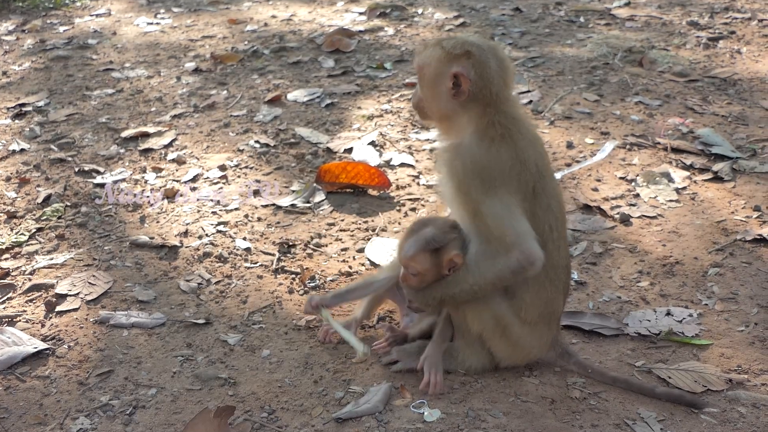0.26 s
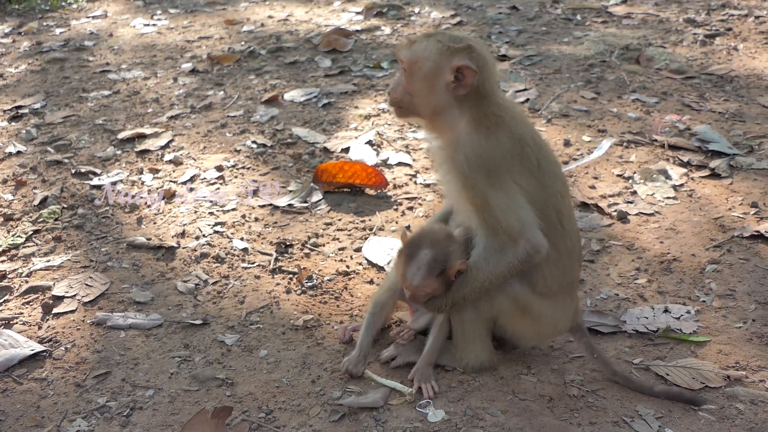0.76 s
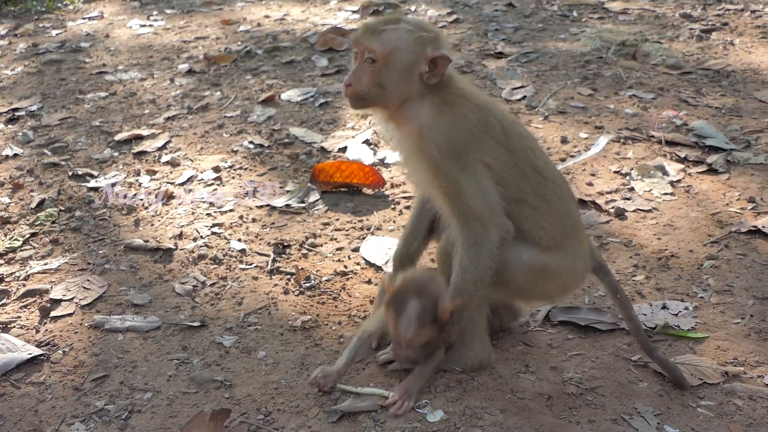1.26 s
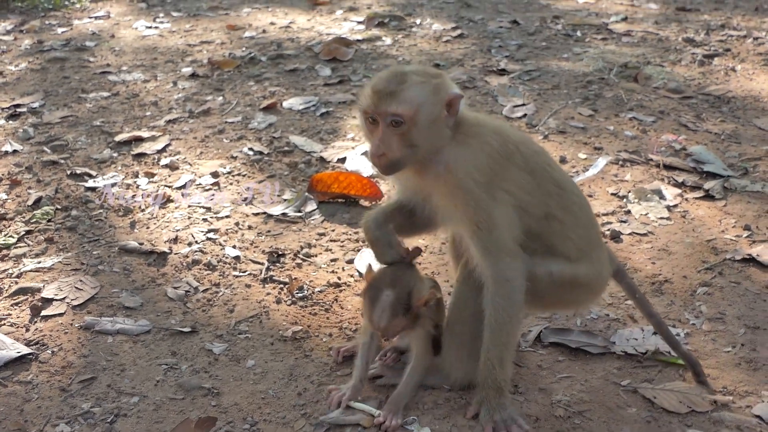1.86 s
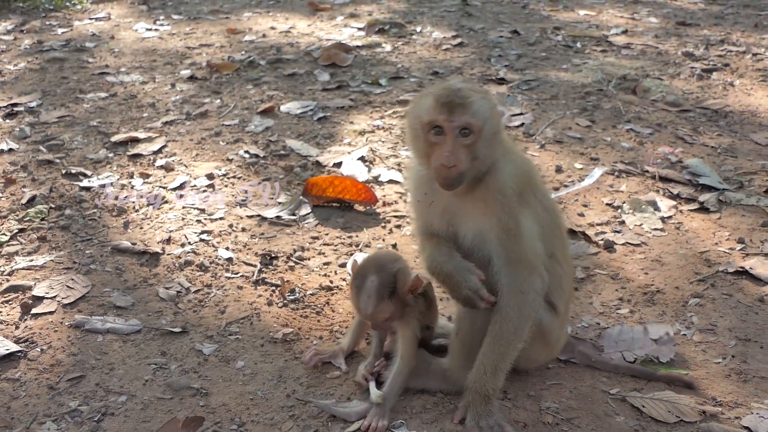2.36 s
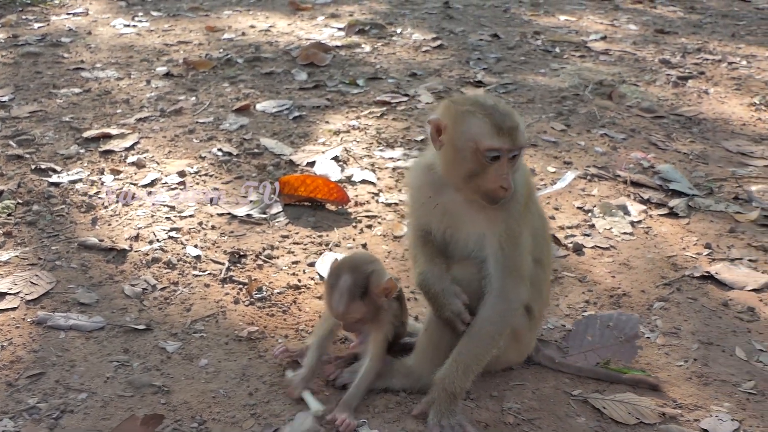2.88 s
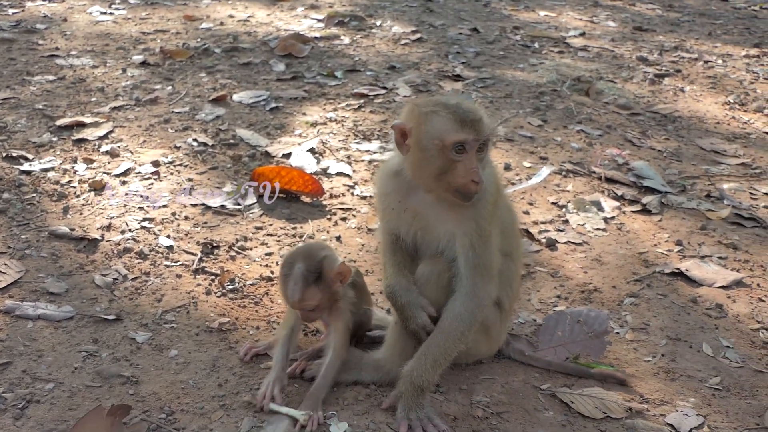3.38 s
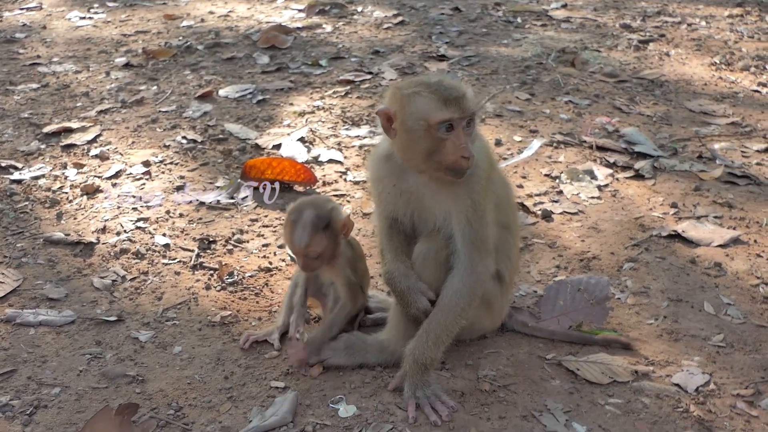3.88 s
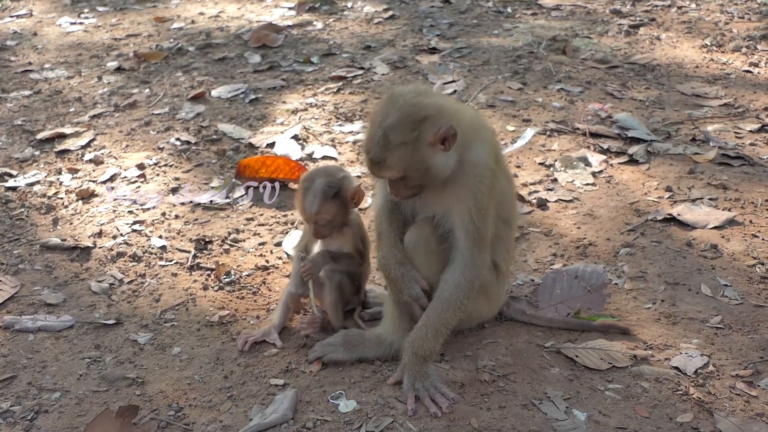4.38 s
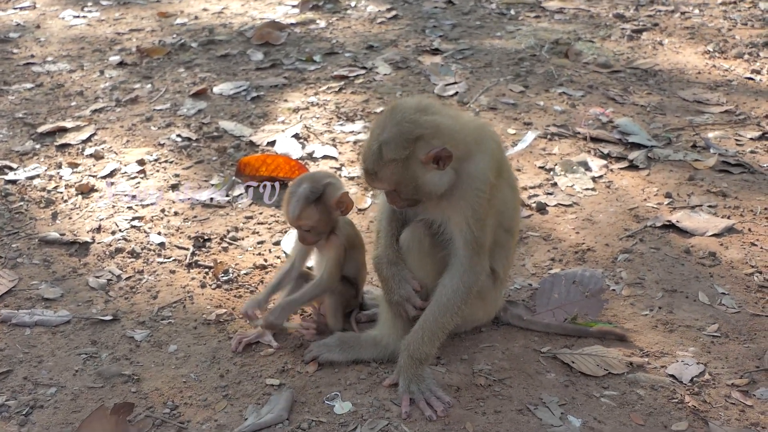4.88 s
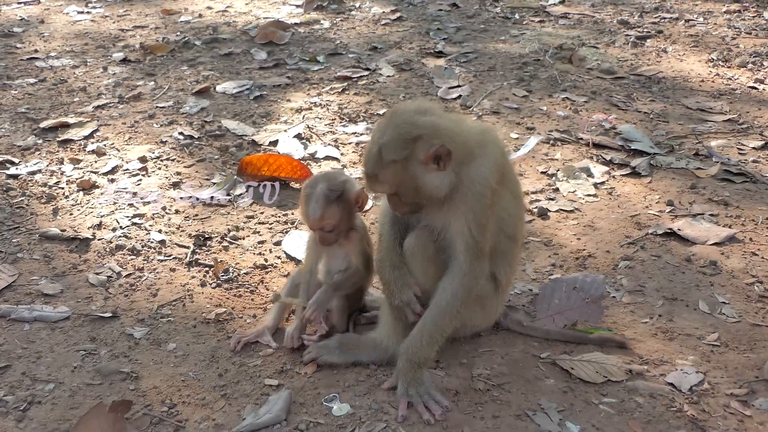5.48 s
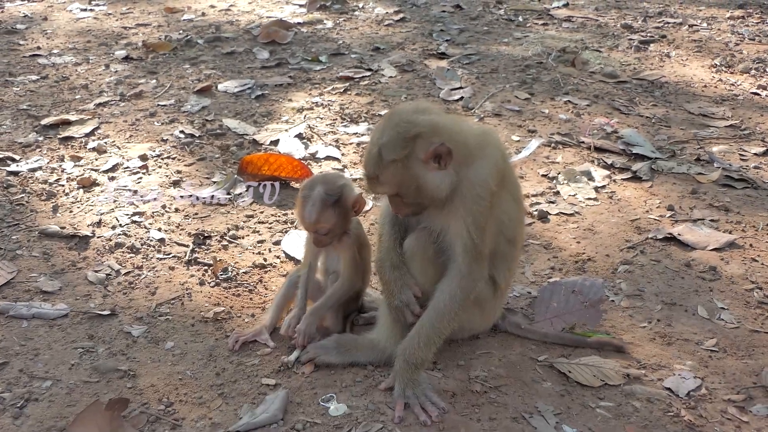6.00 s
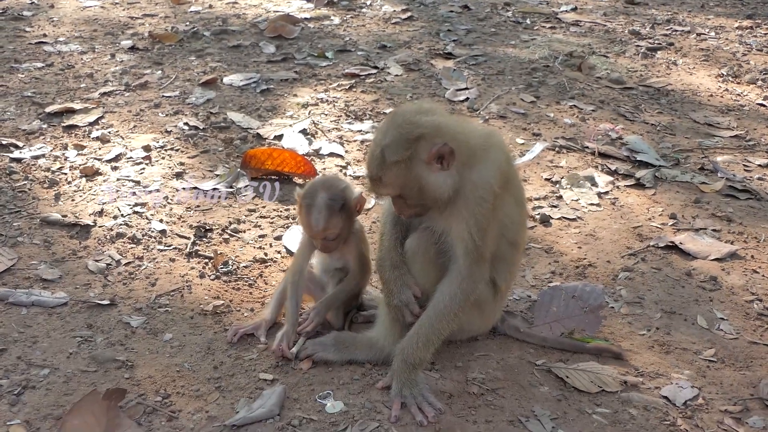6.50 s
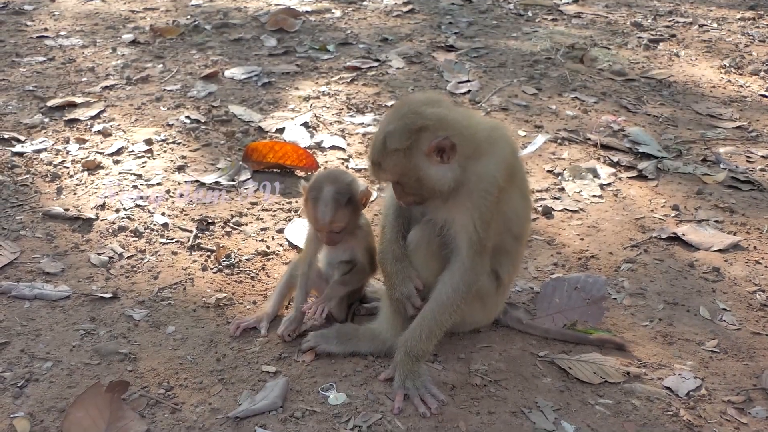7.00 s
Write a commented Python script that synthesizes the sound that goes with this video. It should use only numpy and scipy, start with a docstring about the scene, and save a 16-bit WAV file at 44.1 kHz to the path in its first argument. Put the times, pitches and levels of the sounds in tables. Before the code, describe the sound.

A piercing, steady cicada drone fills a forest while another insect rasps in slow bursts and dry leaves faintly crackle under shifting monkeys.

```python
"""Forest: cicadas drone, one near singer standing out of a wide chorus; another insect rasps in slow bursts.
Cicada tones are multiples of a trembling click rate; the chorus and the rasp are shaped noise.
Two monkeys shift on dry leaves (sparse crackle, snaps) and handle a small stalk (scuffs, woody rings).
A far bird whistles faint glides over a low, distant rumble of noise and a wavering hum."""
import sys
import numpy as np
from scipy.fft import rfft, irfft, next_fast_len
from scipy.io import wavfile
from scipy.ndimage import map_coordinates

SR = 44100
rng = np.random.default_rng(int(sys.argv[2]) if len(sys.argv) > 2 else 0)


def store_pcm(level_fs):
    """Save levels as 16-bit WAV."""
    pcm = np.round(np.clip(level_fs, -1, 1) * 32767).astype(np.int16)
    wavfile.write(sys.argv[1], SR, np.atleast_2d(pcm).T)


N = 319725
TIME_S = np.arange(N) / SR


def amp(db):
    """Gain of a level in dB."""
    return 10 ** (np.asarray(db) / 20)


def unit(x):
    """x at rms 1."""
    return x / np.sqrt(np.mean(x ** 2) + 1e-20)


def noise(*shape):
    """White Gaussian noise."""
    return rng.standard_normal(shape)


def along(points, hz):
    """(Hz, value) points interpolated on a log frequency axis."""
    point_hz, value = np.transpose(points)
    return np.interp(np.log(hz + 1), np.log(point_hz + 1), value)


def curves(rows):
    """One value per sample for each column after the time."""
    knot_s, *columns = np.transpose(rows)
    return [np.interp(TIME_S, knot_s, column) for column in columns]


def wobble(knots_per_s):
    """A smooth random curve: a spline through random knots."""
    coarse = np.arange(0, N + 32, 32)
    knots = noise(int(N * knots_per_s / SR) + 4)
    values = map_coordinates(knots, [coarse * knots_per_s / SR])
    return np.interp(np.arange(N), coarse, values)


def rhythm(swings_per_s, drift_cycles):
    """A swing between -1 and 1 that runs early or late by about drift_cycles."""
    return np.sin(2 * np.pi * (swings_per_s * TIME_S + drift_cycles * wobble(1)))


def filtered(x, response):
    """x times a response of frequency."""
    size = next_fast_len(N + SR // 4, real=True)
    hz = np.fft.rfftfreq(size, 1 / SR)
    return irfft(rfft(x, size) * response(hz), size)[..., :N]


def shaped(x, spectrum):
    """x through a (Hz, dB) gain curve."""
    return filtered(x, lambda hz: amp(along(spectrum, hz)))


def coloured(x, spectrum):
    """x with a (Hz, dB) spectrum, at rms 1."""
    return unit(shaped(x, spectrum))


def scattered(phase, direct, fades_per_s):
    """A tone arrives directly and by many beating paths through the trees: two unrelated mixtures."""
    sine, cosine = np.sin(phase), np.cos(phase)
    pair = np.array([wobble(fades_per_s) * sine + wobble(fades_per_s) * cosine for _ in range(2)])
    pair[0] += direct * sine
    return pair / np.sqrt(1 + direct ** 2 / 2)


def trunks(x, echo_db=-16, count=8):
    """Nearby trunks return weak copies, 5 to 50 ms late, that comb the sound."""
    delays = rng.integers(SR // 200, SR // 20, count)
    echoes = sum(np.pad(x, ((0, 0), (delay, 0)))[:, :N] for delay in delays)
    return x + amp(echo_db) * echoes


# left-right likeness: freq_hz, likeness_0_to_1
LIKENESS = [(25, .5), (70, 0.92), (300, 0.12), (1500, 0.32), (2700, 0.77), (4200, 0.75), (5400, 0.94),
            (8200, 0.9), (10000, 0.7), (12000, 0.7), (15000, 0.1)]


def stereo(pair):
    """Two unrelated signals become mid and side; the side shrinks where left and right are alike."""
    def mid_side_gain(hz):
        likeness = np.clip(along(LIKENESS, hz), 0, 1)
        return np.array([np.ones_like(hz), np.sqrt((1 - likeness) / (1 + likeness))])

    mid, side = filtered(pair, mid_side_gain)
    return np.array([mid + side, mid - side])


# rumble noise spectrum: freq_hz, relative_db
RUMBLE_SPECTRUM = [(22, -16), (31, -19), (40, -21), (54, -3), (76, -1), (120, -1.5), (160, -8),
                   (195, -16.5), (310, -16), (430, -23.5), (720, -20.5), (1100, -22), (2000, -22),
                   (4400, -36)]


def rumble(hum_hz=72, hum_db=-56, air_db=-50):
    """Distant low noise with a wavering hum in it, stronger on the right."""
    air = amp(air_db) * coloured(noise(2, N), RUMBLE_SPECTRUM)
    hum_phase = 2 * np.pi * np.cumsum(hum_hz + 2 * wobble(4)) / SR
    air[0] += amp(hum_db + 1.1 * wobble(3.8)) * np.sin(hum_phase)
    left_minus_right_db = [(40, -4.0), (100, -7.5), (170, -4.5), (300, -2.0), (1500, -0.5)]

    def lean(hz):
        half_db = along(left_minus_right_db, hz) / 2
        return amp(np.array([half_db, -half_db]))

    return filtered(stereo(air), lean)


# bird notes: start_s, length_s, start_hz, end_hz, relative_db
BIRD_NOTES = [(.53, 0.18, 1640, 1660, -69), (0.73, .16, 1720, 1690, -68), (1.789, 0.118, 1713, 1536, -67),
              (3.352, 0.1, 1390, 1397, -63)]


def bird(trim_db=6.0):
    """Soft gliding whistles, blurred by the trees."""
    level, pitch_hz = np.zeros(N), np.zeros(N)
    for start_s, length_s, start_hz, end_hz, db in BIRD_NOTES:
        n = round(length_s * SR)
        start = round(start_s * SR)
        level[start:][:n] = amp(db + trim_db) * np.hanning(n)
        pitch_hz[start:][:n] = np.linspace(start_hz, end_hz, n)
    return level * scattered(2 * np.pi * np.cumsum(pitch_hz) / SR, direct=0.9, fades_per_s=68)


# tones of each chorus singer: click_rate_multiple, relative_db
CHORUS_TONES = [(5, 0), (10, 1), (15, -8), (20, -26), (25, -40)]


def singers(crowd):
    """Many far cicadas on different click rates fill a noise band around each of their tones."""
    def bands(hz):
        power = sum(amp(db + along(crowd, hz / k)) ** 2 / k for k, db in CHORUS_TONES)
        return np.sqrt(power)

    return unit(filtered(noise(2, N), bands))


# chorus levels: time_s, slow_singers_db, fast_singers_db
CHORUS_LEVELS = [(0, -32.5, -34.5), (1.5, -32, -36), (3, -32.5, -34.5), (4.5, -32, -34.5), (5.7, -32, -32),
                 (7.25, -32.5, -32)]
# spread of the singers: click_rate_hz, relative_db
SLOW_CROWD = [(420, -50), (455, -24), (476, -17), (488, -9.5), (505, -7), (526, 0), (538, -1), (552, -12),
              (580, -60)]
FAST_CROWD = [(520, -68), (545, 8.5), (560, -4), (580, -14), (610, -13.5), (660, -80)]
# hiss spectrum: freq_hz, relative_db
HISS_SPECTRUM = [(1900, -49), (2400, -9), (3050, 5), (4000, -8), (4700, -37), (5900, 8.5), (6900, 0),
                 (7600, -14), (8500, 1), (9000, -13), (10600, 4.5), (11400, -6), (11800, -41), (15500, -36)]


def chorus(throbs_per_s=6.7, throb_db=2, stutter_db=4.0, hiss_db=-45.5):
    """The faster singers slowly join in, throbbing and stuttering; the farthest insects merge into a hiss."""
    slow_db, fast_db = curves(CHORUS_LEVELS)
    throb = throb_db * rhythm(throbs_per_s, drift_cycles=0.35)
    stutter = stutter_db * np.tanh(wobble(40))
    slow = amp(slow_db) * singers(SLOW_CROWD)
    fast = amp(fast_db + throb + stutter) * singers(FAST_CROWD)
    hiss = amp(hiss_db) * coloured(noise(2, N), HISS_SPECTRUM)
    return slow + fast + hiss


# rasp bursts: start_s, length_s, low_resonance_relative_db, high_resonance_relative_db
RASP_BURSTS = [(0.47, 0.26, -50, -57), (1.13, 0.19, -48, -40), (1.778, .22, -48, -44.5),
               (2.12, 0.14, -52, -48.5), (2.647, 0.26, -48.5, -42), (3.3, 0.26, -50.5, -42),
               (3.924, 0.18, -51, -43), (4.59, 0.092, -48.5, -54), (5.117, 0.14, -47, -49),
               (5.895, 0.18, -48.5, -60)]
# resonance spectra: freq_hz, relative_db
RASP_LOW_SPECTRUM = [(2000, -19), (2800, -3), (3200, 12.5), (3600, 8.5), (4200, 5.5), (5500, -35),
                     (6300, -23), (7200, -6), (9000, -10), (10500, -9), (12000, -43)]
RASP_HIGH_SPECTRUM = [(2800, -32), (3500, 2), (3900, 7), (4250, 7), (4650, -4.5), (6000, -9), (8000, -8),
                      (12000, -35)]


def rasping_insect(flutter_db=1.6, swell_db=0.5, rise_s=0.049, t60_s=1.56, low_trim_db=5.5, high_trim_db=-0.5):
    """Each burst of scraping swells unevenly, rings two broad resonances and dies away among the trees."""
    power = np.zeros((2, N))
    for start_s, length_s, low_db, high_db in RASP_BURSTS:
        attack = 1 - np.exp(-np.maximum(TIME_S - start_s, 0) / rise_s)
        decay = amp(-60 * np.maximum(TIME_S - start_s - length_s, 0) / t60_s)
        power += (amp([[low_db], [high_db]]) * attack * decay) ** 2
    unevenness = amp(swell_db * np.array([wobble(21.96), wobble(21.93)]))
    low_level, high_level = np.sqrt(power) * unevenness
    scrape = noise(2, 2, N) * amp(flutter_db * wobble(120))
    low = low_level * coloured(trunks(scrape[0]), RASP_LOW_SPECTRUM)
    high = high_level * coloured(trunks(scrape[1]), RASP_HIGH_SPECTRUM)
    return amp(low_trim_db) * low + amp(high_trim_db) * high


def breaks(per_s):
    """Sparse random impulses: tiny leaf breaks."""
    return noise(2, N) * (rng.random((2, N)) < per_s / SR)


# litter shuffle: time_s, relative_db
SHUFFLE_LEVELS = [(0, -78), (1, -70), (1.4, -57), (1.7, -75), (2, -60), (2.5, -61), (3.52, -59),
                  (3.61, -48), (3.75, -59), (3.9, -55), (4.02, -53), (4.3, -56.5), (5, -65), (5.7, -75),
                  (7.25, -67)]
# limb brushes: start_s, length_s, peak_db
BRUSHES = [(1.8, .26, -44), (3.54, 0.13, -52), (3.898, 0.18, -45), (4.62, 0.13, -54), (5.69, .1, -48)]
# leaf snaps: start_s, relative_db
SNAPS = [(0.4354, -60), (1.3783, -53), (1.898, -49), (2.0113, -39), (3.3314, -53), (3.9703, -52),
         (5.215, -39), (5.5553, -52), (5.7334, -49)]
# shuffle and stalk scuff spectrum: freq_hz, relative_db
STALK_SPECTRUM = [(200, -17), (400, -3.5), (700, -2.5), (1400, 0), (2200, -1), (5000, -8), (10000, -8),
                  (15000, -26)]
# brush and snap spectrum: freq_hz, relative_db
LEAF_SPECTRUM = [(800, -23), (2500, -4), (4500, -20), (8000, 8), (11000, -10), (15000, -21)]


def leaves(shuffle_breaks_per_s=500, brush_breaks_per_s=2500, snap_t60_s=0.028, snap_trim_db=10):
    """Dry leaves crackle in tiny breaks, denser and brighter under a brushing limb, with larger snaps."""
    snaps, stroke = np.zeros((2, N)), np.zeros(N)
    t = np.arange(SR // 10) / SR
    for start_s, db in SNAPS:
        burst = amp(db + snap_trim_db - 60 * t / snap_t60_s) * noise(2, len(t))
        snaps[:, round(start_s * SR):][:, :len(t)] += burst
    for start_s, length_s, db in BRUSHES:
        n = round(length_s * SR)
        stroke[round(start_s * SR):][:n] += amp(db) * np.hanning(n)
    shuffle_level = amp(curves(SHUFFLE_LEVELS)[0] - 1)
    shuffle = shuffle_level * coloured(breaks(shuffle_breaks_per_s), STALK_SPECTRUM)
    brush = stroke * coloured(breaks(brush_breaks_per_s), LEAF_SPECTRUM)
    return shuffle + brush + shaped(snaps, LEAF_SPECTRUM)


# stalk and ground touches: start_s, relative_db, ring_hz, ring_share_db
KNOCKS = [(3.095, -40, 1860, 12), (3.111, -37, 1350, 1), (3.173, -34.5, 900, 11), (3.224, -41, 1300, 3),
          (3.337, -49, 890, 15), (3.423, -47, 1380, 15), (3.579, -35, 664, 3), (3.603, -28, 1740, -5),
          (3.616, -34, 634, -4), (3.656, -39, 1300, 3)]


def knocks(t60_s=0.049, ring_t60_s=0.027, rise_s=0.001, scuff_trim_db=4.0, ring_trim_db=-7.5):
    """Each touch is a short dry scuff of noise and a dull woody ring, a decaying sine."""
    scuffs, rings = np.zeros((2, N)), np.zeros((2, N))
    t = np.arange(SR // 5) / SR
    contact = 1 - np.exp(-t / rise_s)
    for start_s, db, ring_hz, ring_share_db in KNOCKS:
        start = round(start_s * SR)
        at = slice(start, start + len(t))
        scuff_level = amp(db + scuff_trim_db - 60 * t / t60_s)
        ring_level = amp(db + ring_share_db + ring_trim_db - 60 * t / ring_t60_s)
        scuffs[:, at] += contact * scuff_level * noise(2, len(t))
        rings[0, at] += contact * ring_level * np.sin(2 * np.pi * ring_hz * t)
    return rings + shaped(scuffs, STALK_SPECTRUM)


# near song: time_s, low_tone_relative_db, octave_relative_db
SONG_LEVELS = [(0, -30.5, -28.5), (0.45, -31.5, -26.5), (0.9, -28.5, -29.5), (2.0, -28.5, -28.5),
               (2.35, -32.5, -29.5), (2.85, -28.5, -27.5), (3.35, -33.5, -29), (4.1, -26.5, -30),
               (4.7, -32, -28), (5.5, -29, -29.5), (5.9, -31.5, -31.5), (7.25, -36, -30.5)]
# weaker partials: click_rate_multiple, relative_db
PARTIALS = [(4, -56.5), (6, -48.5), (7, -59.5), (8, -56), (9, -71), (11, -45), (12, -51), (13, -57.5),
            (15, -38.5), (16, -49.5), (17, -60), (20, -45.5), (21, -65.5), (25, -62)]


def near_cicada(jitter_hz=0.848, low_trim_db=-1.34, octave_trim_db=0.02, wander_db=1.5):
    """A trembling tymbal click rate surges and sags as the singer tires; its 5th and 10th multiples lead."""
    click_hz, sag_hz_per_s = 543.1, 0.22
    surge_hz, surge_db = 1.128, 0.65
    partials_db, dulling_db_per_s = -1, 0.48
    surge = rhythm(2.5, drift_cycles=0.2474)
    click_rate_hz = click_hz - sag_hz_per_s * TIME_S + surge_hz * surge + jitter_hz * wobble(130)
    phase = 2 * np.pi * np.cumsum(click_rate_hz) / SR
    low_db, octave_db = curves(SONG_LEVELS)
    low_level = amp(low_trim_db + low_db + wander_db * wobble(5.93))
    low = low_level * scattered(5 * phase, direct=0.74, fades_per_s=36)
    octave = amp(octave_trim_db + octave_db) * scattered(10 * phase, direct=0.75, fades_per_s=125)
    partials = sum(amp(db) * scattered(k * phase, direct=0.7, fades_per_s=65) for k, db in PARTIALS)
    partials_level = amp(partials_db - dulling_db_per_s * TIME_S + surge_db * surge)
    return low + octave + partials_level * partials


def scene():
    """Insects, bird and monkeys, leaning slightly left, over the rumble."""
    life = stereo(bird() + chorus() + rasping_insect() + leaves() + knocks() + near_cicada())
    return rumble() + life * amp([[0.25], [-0.25]])


def record(dry, top_hz=15600):
    """Nothing passes at or above the band limit."""
    return filtered(dry, lambda hz: hz < top_hz)


dry = scene()
out = record(dry)
store_pcm(out)
```